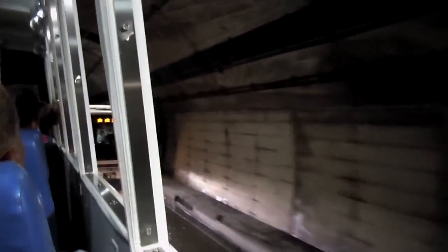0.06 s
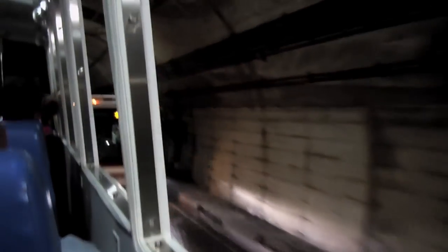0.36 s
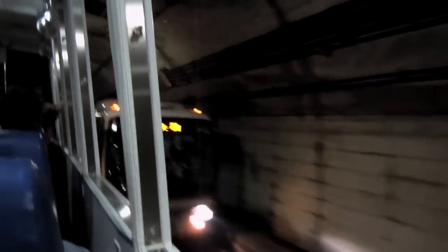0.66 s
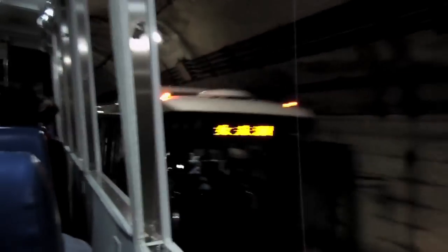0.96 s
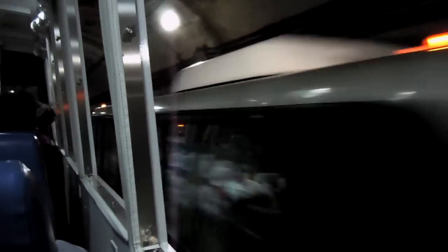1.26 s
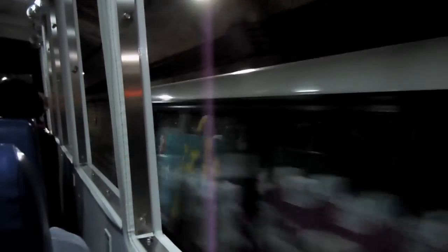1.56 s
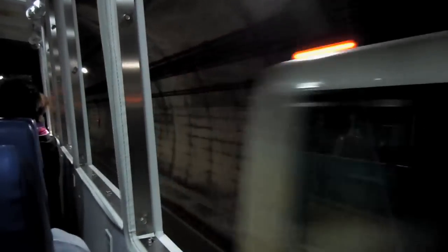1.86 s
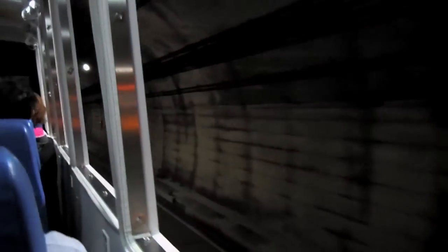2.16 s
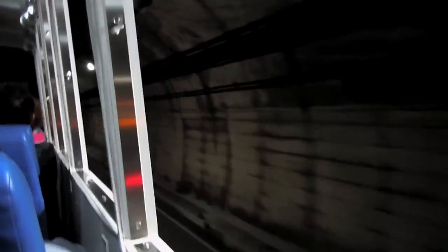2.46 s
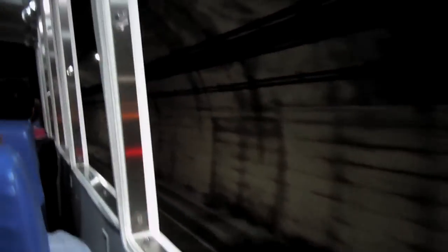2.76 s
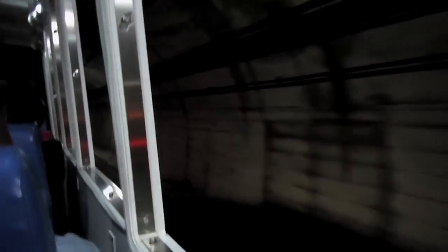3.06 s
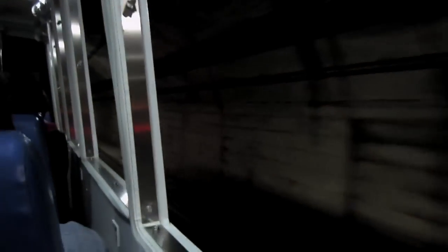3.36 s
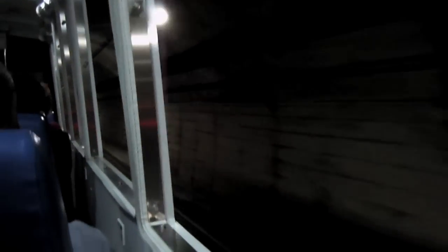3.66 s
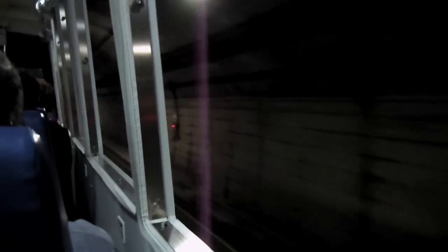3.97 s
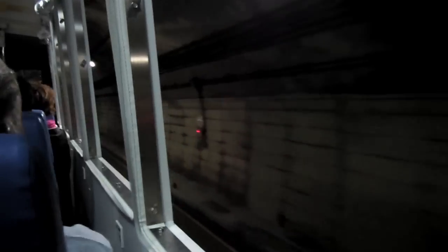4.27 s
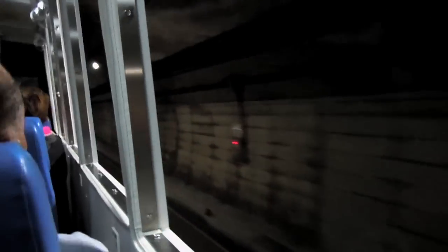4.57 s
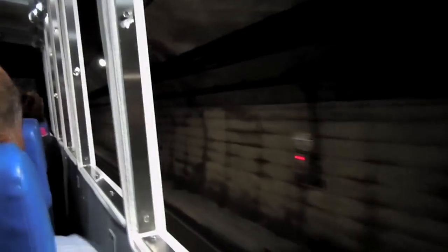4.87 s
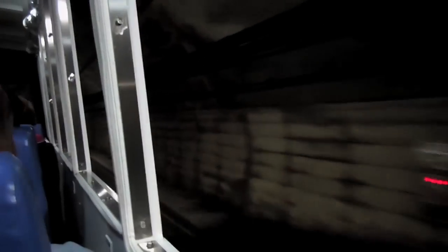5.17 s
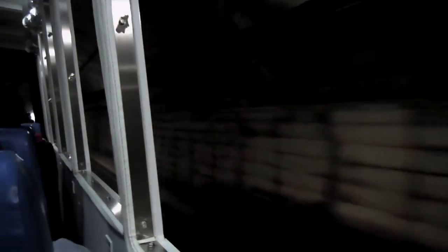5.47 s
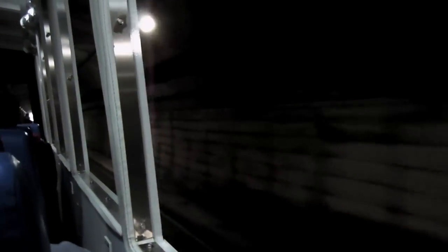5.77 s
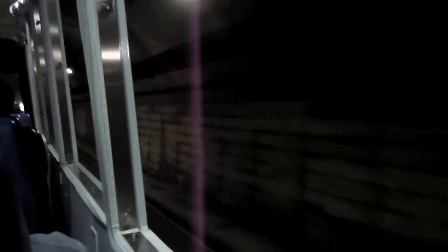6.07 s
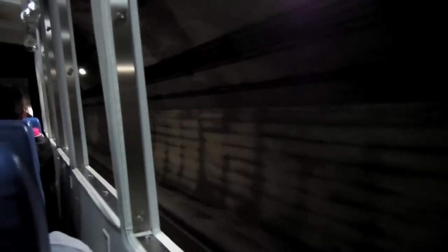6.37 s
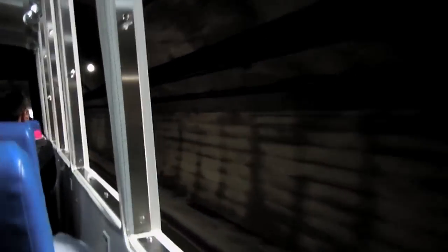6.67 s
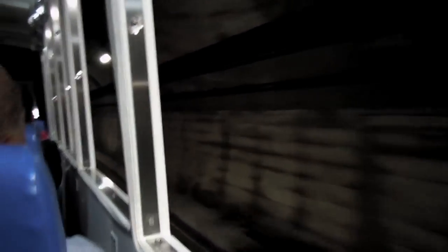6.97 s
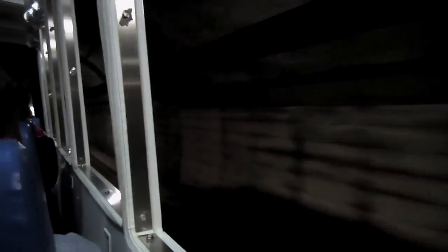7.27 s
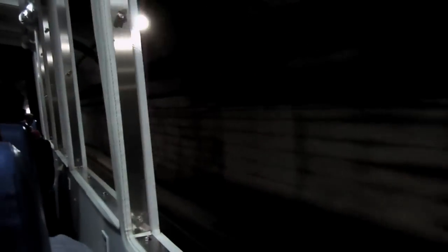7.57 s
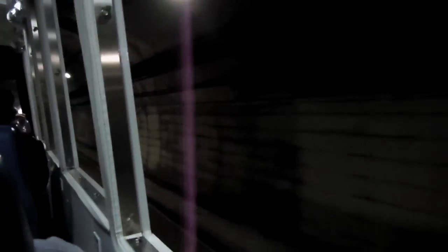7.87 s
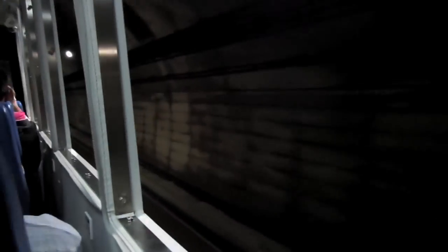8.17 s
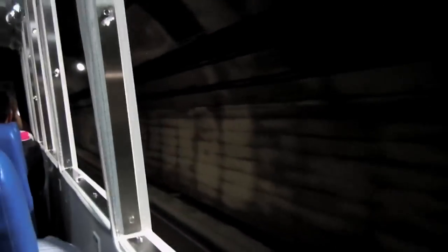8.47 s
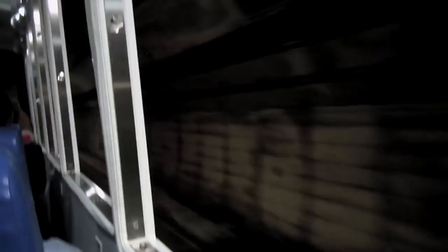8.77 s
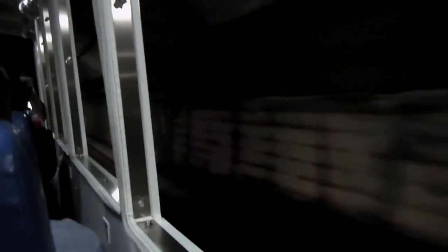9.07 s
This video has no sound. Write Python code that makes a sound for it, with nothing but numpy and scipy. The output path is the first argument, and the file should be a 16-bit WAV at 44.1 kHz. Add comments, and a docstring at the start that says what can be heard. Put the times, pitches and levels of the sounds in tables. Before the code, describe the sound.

Inside a bus speeding through a tunnel, a low rising drone and tyre roar, with wind from the window buffeting the microphone.

```python
"""Bus in a tunnel, window open

Inside a bus gathering speed in a narrow tunnel, the drive booms on a rising note. The walls throw
back tyre roar and hiss, which swell as an oncoming bus goes by. Up front, the draught from the
window buffets the microphone with low throbs, thumps, tiny squawks and short tearing slaps."""
import sys
import numpy as np
from scipy import signal
from scipy.io import wavfile
from scipy.ndimage import uniform_filter1d

SR = 44100
rng = np.random.default_rng(int(sys.argv[2]) if len(sys.argv) > 2 else 0)


def wav_record(signal):
    """Record a signal, one row per channel, as 16-bit PCM in the file named by sys.argv[1]."""
    frames = np.transpose(np.atleast_2d(signal))
    bounded = np.clip(frames, -1, 1)
    # unit amplitude maps onto the largest positive 16-bit level
    quanta = np.round(bounded * 32767).astype(np.int16)
    wavfile.write(sys.argv[1], SR, quanta)


N = 406602

# tone of the tyre roar and of the hiss: freq_hz, relative_density_db
ROAR_COLOUR = [(100, 13.5), (250, -3), (420, -9), (560, -6), (950, -1.5), (1300, -10), (2000, -7),
               (3000, -22.5), (5000, -19.5), (9000, -45)]
HISS_COLOUR = [(1500, -14), (3000, -3.5), (4300, -0.5), (5500, -3), (7000, 1.5), (8400, 4.5), (9500, 2),
               (10500, -8.5), (12000, -6.5)]
# how alike left and right are in the wash off the walls: freq_hz, correlation
WALL_STEREO = [(100, 0.91), (400, 1), (900, 1), (2500, 1), (3400, 1), (4300, 0.7), (5600, 1), (7000, 0.93),
               (8500, 0.21), (10500, 0)]
# presence ride on the roar, around 2 kHz: time_s, lift_db
ROAR_PRESENCE = [(0, -5.5), (1.3, -1.5), (2.2, 0.5), (4, 1.5), (5.2, 2), (6.4, 3.5), (8.1, 1.5),
                 (9.22, -0.5)]
# things going by, the oncoming bus above all: peak_s, rise_s, fall_s, roar_db, hiss_db
PASS_BYS = [(0.05, 0.5, 0.48, -32, -41.5), (0.85, 0.4, 0.26, -32.5, -43), (2.15, 0.34, 0.71, -30.5, -42),
            (2.72, 0.87, 0.12, -27, -36), (3.75, 0.9, 0.3, -32, -40.5), (5.0, 0.65, 0.21, -34, -42.5),
            (5.32, 0.16, 0.28, -61, -32.5), (6.95, 0.47, 0.51, -35.5, -44), (7.7, 0.35, 0.51, -35, -44),
            (8.4, 0.76, 0.35, -37, -43.5)]
# air resonances of the cabin and window opening: centre_hz, width_hz, lift_db
CABIN_MODES = [(247, 21.6, 8), (391, 59, 11), (624, 150, 3), (872, 11, 5.5), (1030, 103, 4.5),
               (2300, 440, 2.5)]

# the drive's low note: time_s, pitch_hz
DRIVE_NOTE = [(0, 42), (2.4, 45.48), (5.1, 59.26), (7.6, 72.95), (9.22, 85)]
# level rides on the cabin's boom at that note, and on its octave: time_s, level_db
BOOM_RIDE = [(0, -41), (1.5, -33), (1.8, -20), (1.97, -20), (2.08, -17.5), (2.33, -13), (2.5, -13.5),
             (2.66, -18.5), (3.15, -16.5), (3.55, -21.5), (3.9, -49), (4.3, -24.5), (5.0, -28), (5.55, -24),
             (6.3, -32), (6.55, -34), (6.9, -20.5), (7.3, -23.5), (7.8, -25), (8.2, -27), (9.22, -35.5)]
OCTAVE_RIDE = [(0, -31), (0.6, -43), (1.8, -42), (3.8, -49), (4.4, -36), (5.0, -32.5), (5.8, -49),
               (9.22, -51)]

# tone of the draught's low throb and of its flutter: freq_hz, relative_density_db
THROB_COLOUR = [(10, 3), (20, 2), (36, -1.5), (60, -7), (100, -15), (160, -18.5), (300, -41.5)]
FLUTTER_COLOUR = [(50, -0.5), (110, -3), (240, -4.5), (400, -11), (800, -18.5), (1400, -25), (2000, -27),
                  (3000, -39), (6000, -54)]
# how alike left and right are in the wind: freq_hz, correlation
WIND_STEREO = [(20, 1), (60, 0.33), (130, 0.15), (300, 0.04), (3000, 0.46)]
# gusts that stand out of the draught: peak_s, half_length_s, flutter_db, throb_db
WINDOW_GUSTS = [(0.117, 0.062, -24, -24), (0.466, 0.075, -34, -18), (0.654, .025, -30, -24),
                (0.954, 0.043, -22, -28), (0.767, 0.043, -28.5, -15.5), (1.58, 0.15, -28.5, -18),
                (2.527, 0.035, -22.5, -17), (2.665, 0.044, -36, -24), (2.74, 0.16, -24.5, -21),
                (3.153, 0.084, -34, -18), (3.39, 0.037, -23, -32), (3.563, 0.027, -24, -15.5),
                (3.772, 0.21, -28.5, -21), (4.172, 0.053, -28, -23), (4.5, 0.27, -27, -24),
                (4.983, 0.12, -24, -21), (5.875, .09, -27, -17), (7.034, 0.098, -24.5, -18),
                (7.643, 0.066, -27, -18.5), (7.94, 0.085, -26.5, -12.5), (8.414, 0.19, -27, -17),
                (8.646, 0.06, -42, -15.5), (9.095, 0.071, -25, -16)]
# lulls, deepest with the other bus alongside, and one late lift: middle_s, half_length_s, change_db
DRAUGHT_LULLS = [(1.309, 0.2, -3.5), (2.08, 0.44, -14.5), (3.28, 0.19, -3.5), (6.29, 0.33, -0.5),
                 (8.93, 0.13, 2)]
# big eddies that thump the microphone: middle_s, dip_level_db, half_length_s
EDDY_THUMPS = [(0.755, -14, 0.0053), (1.023, -17, 0.0025), (1.238, -12, 0.0063), (1.329, -11, 0.0086),
               (1.57, -14, 0.01), (1.977, -9, 0.0067), (2.743, -5.5, 0.0031), (4.932, -9.5, .004),
               (4.995, -15, 0.0023), (5.081, -7, 0.012), (5.13, -12.5, 0.0023), (5.481, -10, 0.0043),
               (6.68, -14.5, 0.0031), (6.903, -11, 0.0045), (7.004, -8.5, 0.0056), (7.607, -6.5, 0.0062),
               (7.673, -8, 0.012), (7.821, -5, .005), (7.927, -13, .004), (7.972, -12, .004),
               (8.199, -14, 0.0081), (8.432, -5.5, 0.0059), (8.55, -11.5, .004), (8.622, -4.5, 0.0089),
               (8.65, -15, 0.0065), (8.713, -9, 0.0076), (9.028, -17, 0.002), (9.109, -15, 0.01)]
# eddies that spin at the window edge: middle_s, pitch_hz, peak_db, half_length_s
EDDY_SQUAWKS = [(0.078, 840, -27, 0.0016), (0.968, 556, -15.5, 0.0044), (0.971, 1050, -17, 0.0032),
                (0.974, 2190, -25, 0.0024), (0.982, 2000, -27, .0012), (2.738, 850, -21, 0.0059),
                (2.879, 814, -19, 0.0061), (3.913, 2130, -21, .001), (5.087, 1020, -34, 0.0034),
                (6.041, 1070, -23, .0012), (6.125, 1800, -18, 0.0011), (6.654, 1860, -21, 0.00098),
                (6.963, 1000, -27.5, .003), (7.798, 1850, -22, 0.0026), (7.965, 1900, -29, 0.001),
                (7.97, 1420, -22, 0.0012), (8.233, 892, -25, .0014)]
# eddies that slap the microphone: hit_s, body_db, crack_db, fade_s, left_over_right_db
EDDY_SLAPS = [(0.031, -20, -49, 0.0046, 3), (0.073, -19.5, -34, 0.0032, -8), (0.097, -24, -36, 0.0038, -11),
              (0.131, -20.5, -34.5, 0.013, 5), (0.177, -21.5, -45, 0.0083, -1),
              (0.265, -25.5, -50, .005, -2), (0.387, -26, -42, 0.0038, 5), (0.647, -29, -48, 0.003, -2),
              (0.731, -23.5, -37, 0.007, -7), (0.971, -19, -32, 0.007, -7), (0.987, -21, -36, 0.0062, 12),
              (1.505, -22, -38, 0.0069, -4), (1.527, -23, -36, 0.007, -9), (1.59, -22.5, -48, 0.0064, -4),
              (2.535, -33, -47, 0.0046, -12), (2.737, -19, -24.5, 0.0028, -12),
              (2.763, -20, -30, 0.0044, -10), (2.8, -21, -39, 0.0088, 0), (2.881, -14.5, -22, 0.0094, -6),
              (3.175, -25.5, -47, 0.007, 1), (3.386, -25.5, -39, 0.023, -5), (3.565, -22, -34, 0.0049, -3),
              (3.665, -22.5, -50, 0.0037, 3), (3.739, -22.5, -43, .006, -7), (3.821, -22, -38, 0.0028, -2),
              (3.867, -22, -34, 0.0026, -6), (3.918, -27, -34, 0.003, 5), (4.158, -27, -40, 0.006, -3),
              (4.171, -24, -38, 0.0054, 4), (4.2, -25, -46, 0.0042, 0), (4.474, -22, -34, 0.015, -10),
              (4.566, -29, -47, .005, -11), (4.977, -20.5, -33, 0.021, -4), (5.014, -25, -38, .006, -8),
              (5.085, -21.5, -29.5, 0.0047, -4), (5.126, -20.5, -34, 0.007, -2),
              (5.195, -18, -26.5, 0.005, -9), (5.668, -24.5, -37, 0.02, 2), (5.803, -23.5, -33, 0.013, -2),
              (5.89, -25, -41, 0.005, -6), (6.045, -27, -40, 0.0046, -1), (6.125, -24.5, -27.5, 0.0058, -2),
              (6.132, -23, -28, 0.0093, 5), (6.191, -22, -34, .004, -1), (6.295, -27, -34, 0.0066, -1.5),
              (6.487, -24.5, -39, 0.0056, -2), (6.522, -24, -38, 0.004, 1), (6.548, -25, -29, .0015, -7),
              (6.615, -27, -35, 0.0017, -4), (6.637, -22.5, -34, .003, 11), (6.656, -18, -28, 0.0055, -10),
              (6.858, -21, -30, 0.0041, 0), (6.904, -20, -41, 0.0045, -6), (6.962, -21.5, -33.5, .004, -2),
              (7.005, -24, -34, .006, -5), (7.043, -21.5, -29, 0.004, -1.5), (7.092, -21, -39, 0.019, 4),
              (7.313, -24.5, -32.5, 0.0037, -7), (7.48, -26, -38, 0.0068, -6),
              (7.588, -24.5, -30, 0.0072, 1), (7.631, -23, -31, 0.024, -4), (7.759, -22, -39, 0.0057, -6),
              (7.8, -21.5, -28, 0.018, 0), (7.913, -20.5, -29, 0.006, -6),
              (7.966, -21.5, -25, 0.0018, -1.5), (7.972, -22, -27, 0.002, -2.5),
              (7.997, -26, -29, 0.0043, 0), (8.06, -23, -28, 0.0032, -11), (8.13, -23.5, -34, 0.0065, -0.5),
              (8.2, -21.5, -28, 0.011, -1), (8.228, -19, -26, 0.0067, 0), (8.263, -29, -28.5, .0012, -13),
              (8.329, -18.5, -24.5, 0.0095, -5), (8.344, -32, -28, 0.0014, -13),
              (8.45, -21.5, -31, 0.014, 1), (8.525, -25, -34, 0.0032, -1),
              (8.552, -19.5, -28.5, 0.0052, -4), (8.597, -29, -30, 0.0013, -4),
              (8.607, -26, -28.5, 0.0078, 1), (8.645, -29, -32, 0.0044, -4),
              (8.672, -26.5, -32, 0.0036, -5), (8.711, -33, -26, 0.0027, -13), (8.797, -22, -30, .0035, 0),
              (8.831, -24, -29, 0.0036, 0), (8.848, -24, -32, 0.0055, -2), (9.102, -24, -29, 0.0045, 0)]


def from_db(db):
    """Decibels to gain."""
    return 10 ** (np.asarray(db) / 20)


def rms_one(x):
    """Scale to unit power."""
    return x / np.sqrt(np.mean(x ** 2) + 1e-20)


def peak_one(x, size):
    """Scale a stereo burst to unit power over its loudest run of this many samples."""
    return x / np.sqrt(uniform_filter1d(np.mean(x ** 2, axis=0), size).max() + 1e-20)


def ride(points):
    """An automation curve, read at every sample."""
    return np.interp(np.arange(N) / SR, *np.transpose(points))


def at_hz(points, hz):
    """Read a spectrum on a log-frequency axis."""
    freqs, values = np.transpose(points)
    return np.interp(np.log(hz), np.log(freqs), values)


def filtered(x, hz, kind, order=2):
    """Butterworth filter."""
    return signal.sosfilt(signal.butter(order, hz, kind, fs=SR, output="sos"), x)


def panned(lean_db):
    """Left and right gains; a positive lean favours the left."""
    return from_db(np.array([[.5], [-.5]]) * lean_db)


def add(out, s, sound):
    """Mix in a short sound with its middle at this time."""
    at = int(s * SR) - sound.shape[-1] // 2
    first, last = max(at, 0), min(at + sound.shape[-1], N)
    out[:, first:last] += sound[..., first - at:last - at]


def drift(rate_hz):
    """Smooth random modulation of unit power, moving at about this rate."""
    hop, settle = 20, 4000
    pole = np.exp(-2 * np.pi * hop * rate_hz / SR)
    white = rng.standard_normal(N // hop + settle + 2)
    slow = signal.lfilter([1], [1, -2 * pole, pole * pole], white)[settle:]
    return np.interp(np.arange(N) / hop, np.arange(len(slow)), rms_one(slow))


def noise_bands(colour, stereo, count):
    """Coloured stereo noise as a list of (centre_hz, band), with unit power in all."""
    edges = np.geomspace(colour[0][0], min(colour[-1][0], SR / 3), count + 1)
    centres = np.sqrt(edges[1:] * edges[:-1])
    gains = from_db(at_hz(colour, centres)) * np.sqrt(np.diff(edges))
    white, bands = rng.standard_normal((2, 2, N)), []
    for k, hz in enumerate(centres):
        mid, side = rms_one(filtered(white[k % 2], edges[k:k + 2], "band", order=3))
        alike = at_hz(stereo, hz)
        pair = np.sqrt((1 + alike) / 2) * mid + np.sqrt((1 - alike) / 2) * side * [[1], [-1]]
        bands.append((hz, gains[k] / np.linalg.norm(gains) * pair))
    return bands


def cabin(x):
    """The air in the cabin and window opening rings, lifting a band at each resonance."""
    for hz, width_hz, lift_db in CABIN_MODES:
        ringing = signal.lfilter(*signal.iirpeak(hz, hz / width_hz, fs=SR), x)
        x = x + (from_db(lift_db) - 1) * ringing
    return x


def pass_by_gains(roar_bed_db=-33.5, hiss_bed_db=-43.5, roar_sink_db_per_s=0.58, hiss_sink_db_per_s=0.15):
    """Faders for roar and hiss: a slowly sinking bed, with a swell for each thing that goes by."""
    t = np.arange(N) / SR
    power = from_db([roar_bed_db - roar_sink_db_per_s * t, hiss_bed_db - hiss_sink_db_per_s * t]) ** 2
    for s, rise_s, fall_s, roar_db, hiss_db in PASS_BYS:
        away = np.maximum((s - t) / rise_s, (t - s) / fall_s)
        swell = np.exp(-np.minimum(away, 20))
        power += (from_db([[roar_db], [hiss_db]]) * swell) ** 2
    return np.sqrt(power)


def tunnel(patchy_db=1.34, whistle_band_hz=(8150, 8280), whistle_db=-12):
    """Tyre roar and hiss, smoothed by many reflections; a faint whistle rides on the hiss."""
    roar_gain, hiss_gain = pass_by_gains()
    presence_db = ride(ROAR_PRESENCE)
    roar = 0
    for hz, band in noise_bands(ROAR_COLOUR, WALL_STEREO, count=12):
        bell = np.exp(-2 * np.log2(hz / 2000) ** 2)
        roar += band * from_db(patchy_db * drift(32) + presence_db * bell)
    hiss = sum(band for _, band in noise_bands(HISS_COLOUR, WALL_STEREO, count=14))
    whistle = filtered(rng.standard_normal((2, N)), whistle_band_hz, "band", order=1)
    hiss += from_db(whistle_db) * rms_one(whistle)
    return roar_gain * rms_one(cabin(roar)) * panned(-0.096) + hiss_gain * hiss * panned(-0.7)


def drive(waver_db=1.4, third_harmonic_db=-26):
    """The cabin booms with the drive: a low note with faint overtones, climbing with speed."""
    pitch_hz = ride(DRIVE_NOTE) * (1 + 0.0026 * drift(2.8))
    phase = 2 * np.pi * np.cumsum(pitch_hz) / SR
    boom = from_db(ride(BOOM_RIDE)) * (np.sin(phase) + from_db(third_harmonic_db) * np.sin(3 * phase))
    octave = from_db(ride(OCTAVE_RIDE)) * np.sin(2 * phase)
    return from_db(waver_db * drift(12)) * np.sqrt(2) * (boom + octave)


def puffs(rows):
    """Summed power of bell-shaped puffs of air: peak_s, half_length_s, level_db."""
    t = np.arange(0, N, 20) / SR
    power = sum(from_db(db) ** 2 * np.exp(-2 * np.minimum(((t - s) / half_s) ** 2, 20))
                for s, half_s, db in rows)
    return np.interp(np.arange(N) / SR, t, power)


def draught_db(db_per_doubling):
    """Level change of the steady draught: it grows as the bus speeds up and ducks in the lulls."""
    t, pitch_hz = np.arange(N) / SR, ride(DRIVE_NOTE)
    speed_doublings = np.log2(pitch_hz / pitch_hz[0])
    lull_db = sum(db * np.exp(-((t - s) / half_s) ** 2) for s, half_s, db in DRAUGHT_LULLS)
    return db_per_doubling * speed_doublings + lull_db


def wind_throb(bed_db=-20):
    """Big eddies rock both microphone ports: a deep rumble that heaves with each gust."""
    bed = from_db(bed_db + draught_db(db_per_doubling=0.5))
    gusts = puffs([(s, half_s, db) for s, half_s, _, db in WINDOW_GUSTS])
    rumble = sum(band for _, band in noise_bands(THROB_COLOUR, WIND_STEREO, count=7))
    return np.sqrt(bed ** 2 + gusts) * rumble * panned(-0.51)


def wind_flutter(bed_db=-32, unsteady_db=3.5, wake_db=-8.5, wake_half_s=0.037, eddy_hz=32, shared=0.73):
    """Small eddies tear at each port, brighter when stronger, flaring in gusts and around slaps."""
    bed = from_db(bed_db + draught_db(db_per_doubling=1) + unsteady_db * drift(29))
    gusts = puffs([(s, half_s, db) for s, half_s, db, _ in WINDOW_GUSTS])
    wakes = puffs([(s, wake_half_s, body_db + wake_db) for s, body_db, *_ in EDDY_SLAPS])
    per_port = np.array([drift(2 * eddy_hz), drift(2 * eddy_hz)])
    eddies = np.sqrt(shared) * drift(eddy_hz) + np.sqrt(1 - shared) * per_port
    eddies = np.tanh(eddies)   # the air speed has its limits
    flutter = 0
    for hz, band in noise_bands(FLUTTER_COLOUR, WIND_STEREO, count=10):
        octaves = np.log2(hz / 300)
        depth_db = 3.5 + 0.8 * octaves
        flutter += band * rms_one(from_db(depth_db * eddies)) * panned(-2 - 0.1 * octaves)
    return np.sqrt(bed ** 2 + gusts + wakes) * flutter


def thumps(lean_spread_db=3.0):
    """The pressure rises, drops sharply as the core of a big eddy passes, and rebounds."""
    t, out = np.arange(-SR // 25, SR // 25) / SR, np.zeros((2, N))
    for s, db, half_s in EDDY_THUMPS:
        away = (t / half_s) ** 2
        pressure = (2 * away - 1) * np.exp(-away)
        add(out, s, from_db(db) * pressure * panned(lean_spread_db * rng.standard_normal()))
    return out


def squawks(rise_octaves_per_s=90, wobble_octaves=0.27, lean_db=-3):
    """A vortex tightens as it sheds: a few rising cycles, uneven in their own way at each port."""
    t, out = np.arange(-SR // 80, SR // 80) / SR, np.zeros((2, N))
    for s, hz, db, half_s in EDDY_SQUAWKS:
        uneven = rms_one(filtered(rng.standard_normal((2, len(t))), 1140, "low"))
        pitch_hz = hz * 2 ** (rise_octaves_per_s * t + wobble_octaves * uneven)
        phase = 2 * np.pi * np.cumsum(pitch_hz, axis=1) / SR
        chirp = np.cos(phase - phase[:, [len(t) // 2]])   # both ports crest at the middle
        add(out, s, from_db(db) * np.exp(-(t / half_s) ** 2) * chirp * panned(lean_db))
    return out


def slaps(rise_over_fade=0.86, grain_db=7.0, snap_db=-4, colour_spread_octaves=0.39,
          suction_db=9.5, suction_half_s=0.0045, suction_lag_s=0.0034):
    """An eddy breaks on the ports: a snap amid ragged spikes, then a dip in pressure."""
    lead = SR // 50
    t = np.arange(-lead, 2 * lead) / SR
    dip = -np.exp(-((t - suction_lag_s) / suction_half_s) ** 2)
    out = np.zeros((2, N + len(t)))
    for s, body_db, crack_db, fade_s, lean_db in EDDY_SLAPS:
        spikes, sizes = rng.standard_normal((2, 2, len(t)))   # each port meets its own turbulence
        ragged = from_db(grain_db * rms_one(filtered(sizes, 250, "low")))
        burst = spikes * ragged * np.exp(np.minimum(t / rise_over_fade, -t) / fade_s)
        burst /= np.linalg.norm(burst, axis=1, keepdims=True)
        burst[int(lean_db < 0), lead] -= from_db(snap_db)   # the snap hits the windward port
        burst *= panned(lean_db)
        colour = 2 ** (colour_spread_octaves * rng.standard_normal())   # no two thuds alike
        thud = filtered(burst, 520 * colour, "low", order=1)
        thud = filtered(thud, 1300 * colour, "low", order=3)
        body = peak_one(filtered(thud, 150, "high"), size=260)
        edge = filtered(filtered(burst, 2400, "low", order=1), 4200, "low")
        crack = peak_one(filtered(edge, 1300, "high", order=3), size=130)
        suction = from_db(suction_db) * dip * panned(0.9 * lean_db)
        at = int(s * SR)
        out[:, at:at + len(t)] += from_db(body_db) * (body + suction) + from_db(crack_db) * crack
    return out[:, lead:lead + N]


def scene():
    """The mix at the window seat: tunnel wash, drive boom and wind on the microphone."""
    return tunnel() + drive() + wind_throb() + wind_flutter() + thumps() + squawks() + slaps()


def record(dry, low_cut_hz=9.5, ceiling=0.9, high_cut_hz=11500):
    """The microphone sheds the deepest rumble, the highest peaks are rounded and the top is cut."""
    x = filtered(dry, low_cut_hz, "high", order=1)
    rounded = x / (1 + (x / ceiling) ** 4) ** .25
    return signal.sosfilt(signal.ellip(10, .2, 80, high_cut_hz, fs=SR, output="sos"), rounded)


dry = scene()
out = record(dry)
wav_record(out)
```